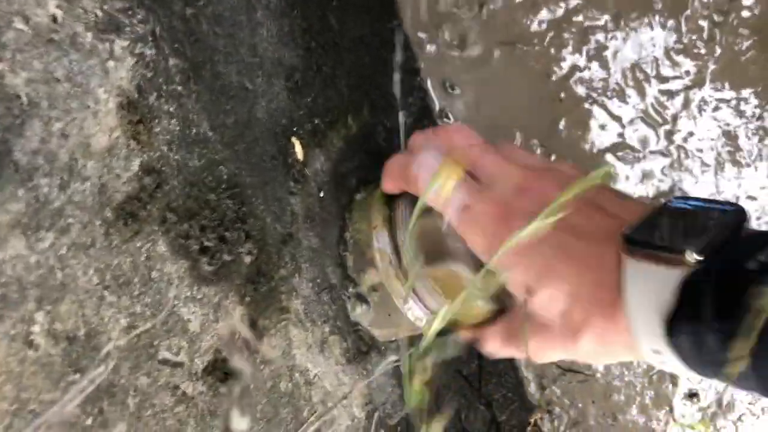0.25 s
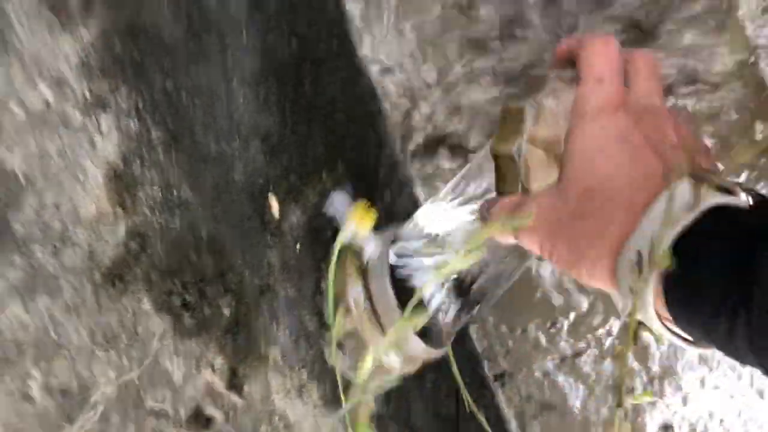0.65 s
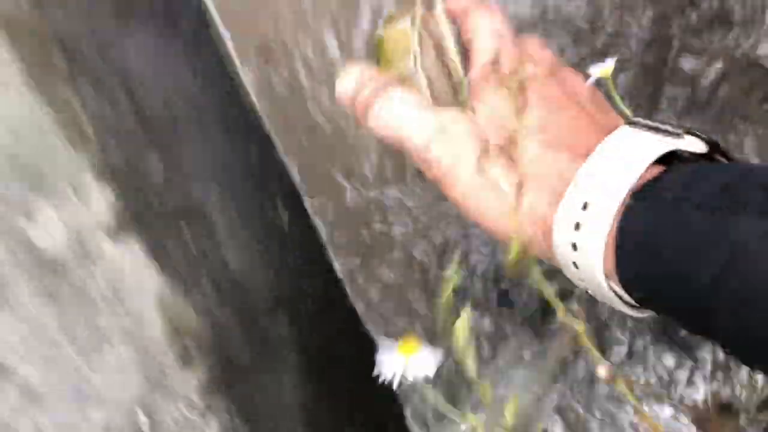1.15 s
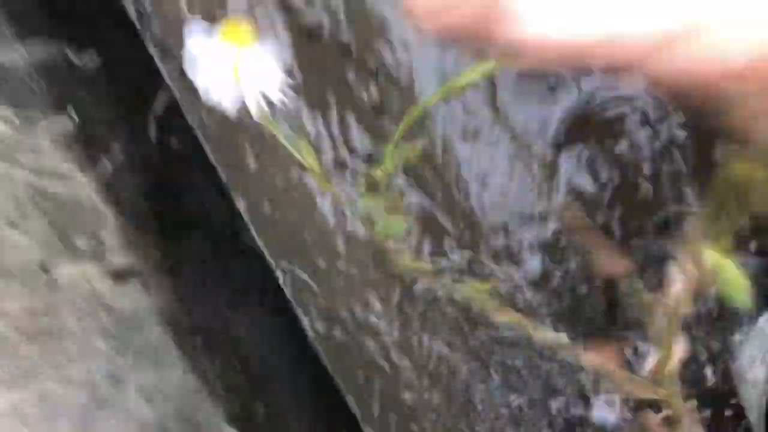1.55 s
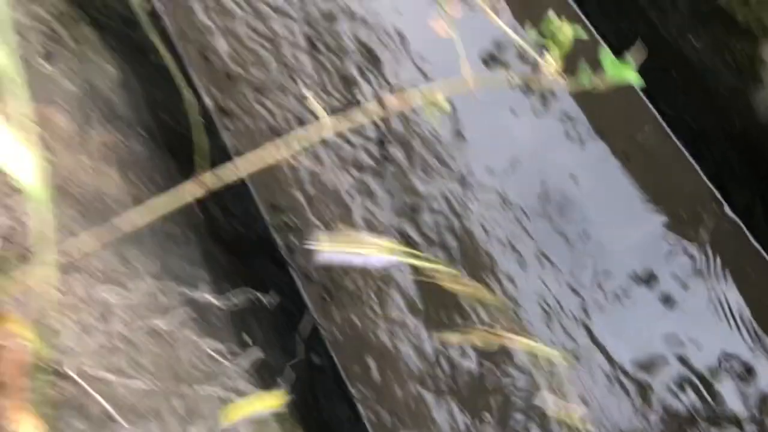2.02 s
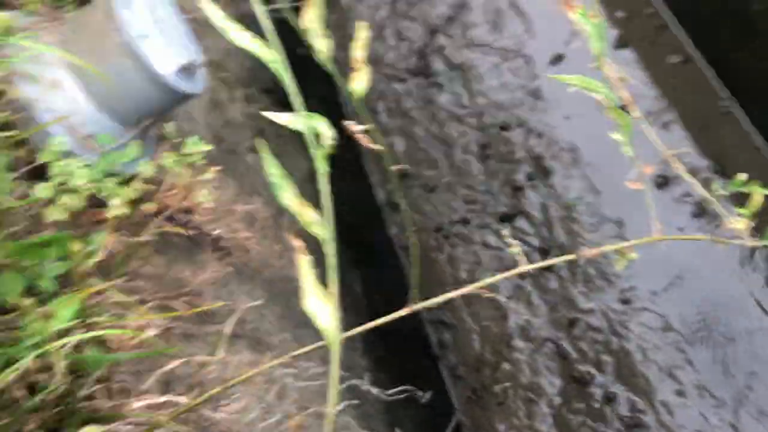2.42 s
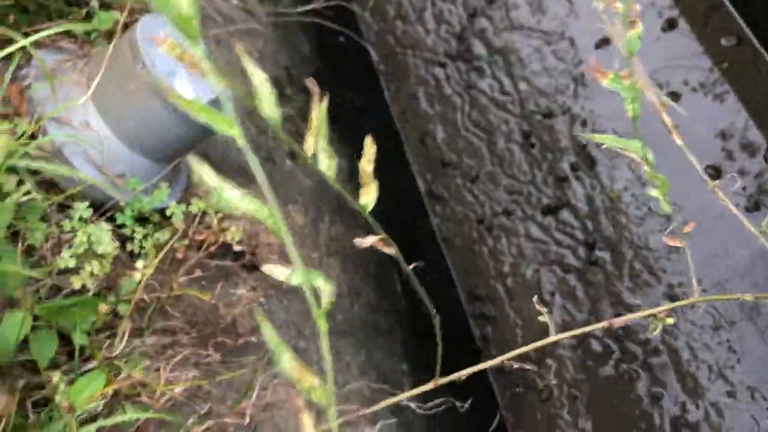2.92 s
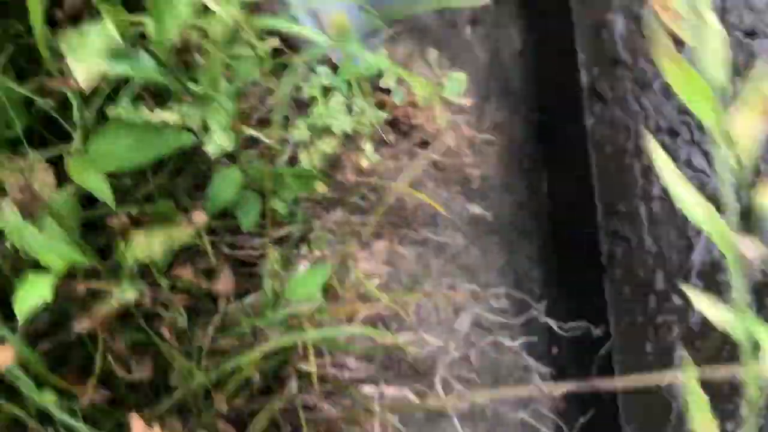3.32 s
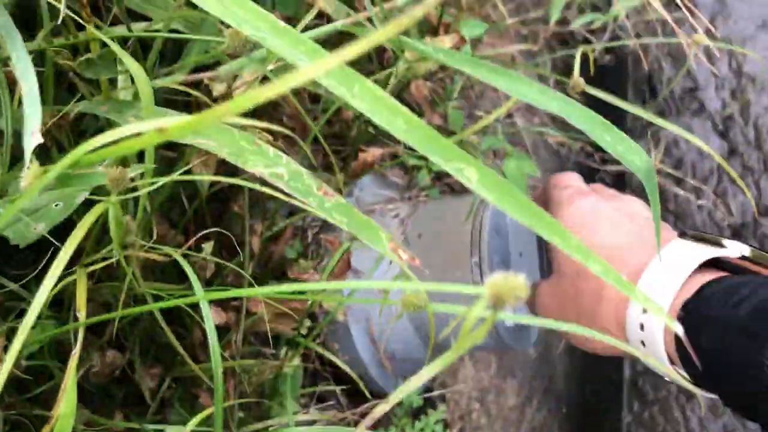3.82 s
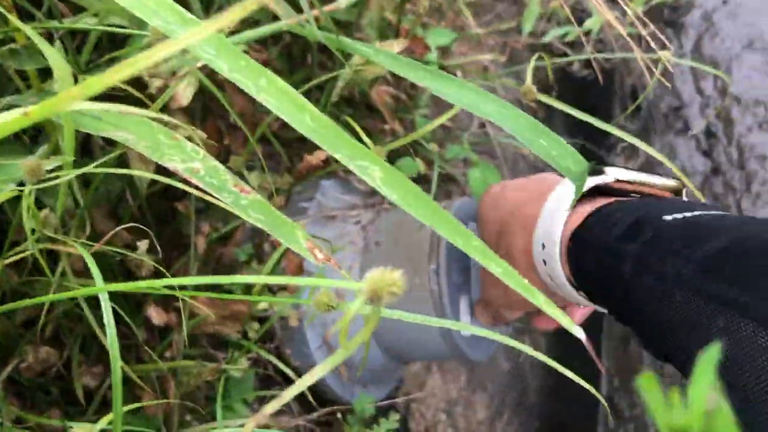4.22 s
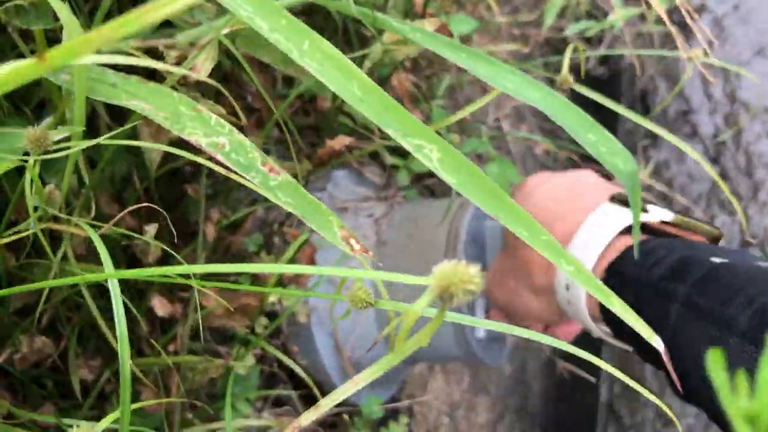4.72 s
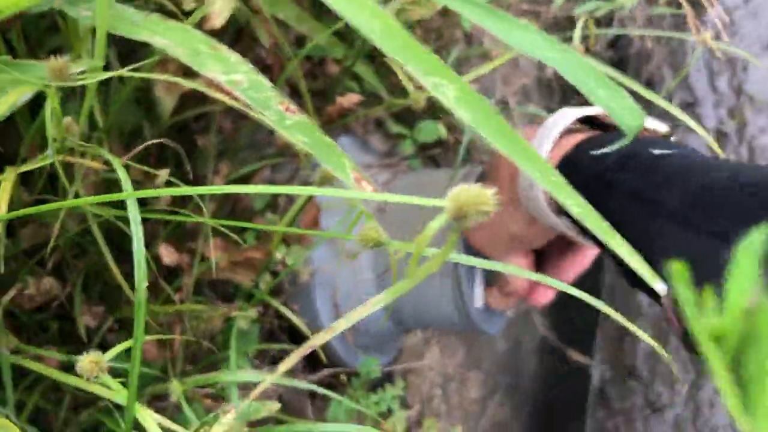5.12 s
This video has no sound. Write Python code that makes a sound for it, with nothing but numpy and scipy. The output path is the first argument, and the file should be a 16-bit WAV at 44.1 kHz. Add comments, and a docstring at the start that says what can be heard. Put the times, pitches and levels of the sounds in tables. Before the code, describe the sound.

Close to a muddy ditch, a cap is pulled off a drain pipe. A weak trickle and small spurts give way to a splashy, bubbling gush with surges, then one hollow knock of the cap. The water falls back to a trickle and thins to separate drips. Late, a sharp snap and faint rubs come from a hand in grass, over high hiss and low rumble. Handheld microphone, same in both ears.

```python
"""Water spurts, gushes in surges and settles to a bubbling trickle as a cap is pulled off a flooded field's
drain. The cap knocks once with a low thump, and a hand in the grass snaps, thuds and rubs, over wash, high
hiss, rumble and a faint engine hum. Water is swarms of ringing bubbles with puffs of splash noise; spray is
tiny noise bursts with ringing beads. The knock is gritty contact through resonances, thuds are sinking tones,
the hum is a wavering sine and the rest is shaped noise. Both ears hear the same."""
import sys
import numpy as np
from scipy import signal
from scipy.fft import rfft, irfft, next_fast_len
from scipy.io import wavfile
from scipy.ndimage import uniform_filter1d

SR = 44100
rng = np.random.default_rng(int(sys.argv[2]) if len(sys.argv) > 2 else 0)


def wrap_up_sound(samples):
    """Save the sound to the file named by the first command line argument, as 16-bit audio."""
    columns = np.atleast_2d(samples).T
    # keep every value between -1 and 1, then stretch to whole-number steps
    tamed = np.clip(columns, -1, 1)
    steps = np.round(tamed * 32767).astype(np.int16)
    wavfile.write(sys.argv[1], SR, steps)


N = 236139
TIME = np.arange(N) / SR


def amp(db):
    """Turns decibels into a linear gain."""
    return 10 ** (np.asarray(db) / 20)


def unit(x):
    """Scales to rms 1."""
    return x / np.sqrt(np.mean(x ** 2) + 1e-20)


def curve(rows, axis=1):
    """Draws one column of a breakpoint table as a line over the whole scene."""
    columns = np.transpose(rows)
    return np.interp(TIME, columns[0], columns[axis])


def add(mix, s, sound):
    """Lays a sound into the mix at time s."""
    part = mix[max(round(s * SR), 0):][:len(sound)]
    part += sound[:len(part)]


def colour(x, tone):
    """Filters x by the gains of a tone table, then scales it to rms 1."""
    hz, db = np.transpose(tone)
    size = next_fast_len(N, True)
    bins = np.fft.rfftfreq(size, 1 / SR)
    gain = amp(np.interp(np.log(bins + 1), np.log(hz), db))
    return unit(irfft(rfft(x, size) * gain, size)[:N])


def drift(hz):
    """Random wandering at rms 1, mostly slower than hz."""
    size = next_fast_len(N, True)
    bins = np.fft.rfftfreq(size, 1 / SR)
    smooth = rfft(rng.standard_normal(size)) / (1 + (bins / hz) ** 4)
    return unit(irfft(smooth, size)[:N])


def fade(t, t60):
    """Exponential decay by 60 dB in t60."""
    return np.exp(-np.log(1000) * t / t60)


def steadied(x, size):
    """Evens out the running power over size samples, leaving the single grains."""
    power = uniform_filter1d(uniform_filter1d(x ** 2, size), size)
    return x / np.sqrt(abs(power) + 0.19)


def resonate(x, hz, width):
    """A resonance of gain about 1 at its centre."""
    r = np.exp(-np.pi * width / SR)
    return 2 * signal.lfilter([1 - r], [1, -r * np.exp(2j * np.pi * hz / SR)], x).real


def bubble(hz, t60, rise):
    """A trapped air pocket swells in about one cycle and rings; its pitch climbs as it nears the surface."""
    t = np.arange(int(t60 * SR) + 2) / SR
    cycles = hz * (t + rise * t * t / (2 * t60))  # pitch climbs by the share rise within t60
    return (1 - np.exp(-t * hz)) * fade(t, t60) * np.sin(2 * np.pi * cycles)


def swarm(per_s, spread_db, cycles, mean_rise, low_hz, high_hz, cluster_s, count=120):
    """Bubbles of many sizes are born in clusters, one for each little spill; most are faint, a few stand out."""
    out = np.zeros(N)
    spills = np.cumsum(rng.gamma(2, 1, 240))
    spills *= TIME[-1] / spills[-1]
    birth_chance = per_s * TIME[-1] / count ** 2
    for hz in np.geomspace(low_hz, high_hz, count):
        length, lift, detune = rng.random(3)
        t60 = cycles * (.5 + length) / np.sqrt(hz * 1500)  # on average, cycles is the T60 in periods at 1500 Hz
        ring = bubble(hz * (1 + 0.043 * detune), t60, 2 * mean_rise * lift)
        ring *= np.sqrt(hz / np.sum(ring ** 2))  # energy in proportion to pitch
        draws = rng.random((count, 4))
        for _, spill, lag, size in draws[draws[:, 0] < birth_chance]:
            s = spills[int(spill * len(spills))] - cluster_s * np.log(lag)
            add(out, s, ring * amp(spread_db * min(-np.log(size), 3)))
    return out


def splat(bubbles, t60):
    """The drops that trap the bubbles burst with a short puff of noise at the same moments."""
    power = signal.oaconvolve(bubbles ** 2, fade(np.arange(2000) / SR, t60) ** 2)[:N]
    return unit(np.sqrt(abs(power)) * rng.standard_normal(N))


def pour(base_db, axis):
    """Strength of the gush: it opens, grows and runs out; each surge swells quickly and ebbs on top of it."""
    # spurts past the loosened cap, surges of the gush and late spills:
    # (time [s], bubbling level [dB], spray level [dB], length scale [s])
    surge_rows = [(-.02, -46, -43.5, 0.085), (0.064, -50, -46.5, 0.15), (.205, -56, -46, .07),
                  (0.41, -52, -42, 0.053), (0.446, -39.5, -34.5, 0.094), (0.606, -40, -33, 0.088),
                  (0.693, -35, -36, 0.059), (0.75, -38, -53, 0.06), (.905, -43, -37, 0.13),
                  (0.991, -39, -35.5, 0.069), (1.036, -33.5, -39, 0.13), (1.204, -44.5, -62, 0.076),
                  (1.684, -45.5, -54, 0.099)]
    surge_peak = 0.26  # share of its length scale after which a surge is strongest
    open_s, attack_s, spent_s, spent_t60 = .445, 0.021, 1.15, 0.29
    growth_db_per_s = 4  # the stream widens as the cap is drawn away
    age = np.clip(TIME, open_s, spent_s) - open_s
    steady = np.minimum(age / attack_s, 1) * amp(base_db + growth_db_per_s * age)
    power = (steady * fade(np.maximum(TIME - spent_s, 0), spent_t60)) ** 2
    for row in surge_rows:
        u = np.maximum(TIME - row[0], 0) / (surge_peak * row[-1])
        power += (amp(row[axis]) * u * np.exp(1 - u)) ** 2
    return np.sqrt(power)


def trickle_db(waver_db=.8, waver_hz=7):
    """The trickle that runs before and after the gush wavers unevenly about its slow course."""
    # strength of the trickle before the waver: (time [s], level [dB])
    trickle_rows = [(0, -55.5), (.3, -56.5), (1.2, -49), (1.55, -50.5), (1.85, -48), (2.1, -50), (2.4, -55),
                    (3.0, -56.5), (3.45, -60), (4.0, -56.5), (4.45, -64), (4.75, -59), (5.35, -62)]
    return curve(trickle_rows) + waver_db * drift(waver_hz)


def crouch(start_s=3.7, length_s=.55):
    """How far the listener has sunk behind the bank, 0-1; this dims trickle spray and makes the drips hollow."""
    return np.clip((TIME - start_s) / length_s, 0, 1)


def water(flow_db, hollow_low_hz=1150, hollow_high_hz=2500, hollow_db=4.5):
    """Crowded bubbles in the gush, separate ones in the trickle, sparse as it thins, all rough with splashing."""
    # filters for the bubbling of gush and trickle: (frequency [Hz], relative gain [dB])
    gush_tone = [(200, -37), (450, -5.5), (700, -15), (1200, 0), (1750, 0), (2500, 0), (4000, -4),
                 (5500, -11.5), (8000, -19)]
    trickle_tone = [(200, -22), (500, -10), (800, -3), (1300, -3.5), (1800, 1), (2150, -4.5), (2800, -1),
                    (3900, -1.5), (5000, -4.5), (7000, -24)]
    gush_db = -45  # bubbling as the pipe opens
    thin_from_db, thin_range_db, thin_share = -52, 5, 0.57  # a weak trickle breaks up into separate drips
    hollow_share = 0.41  # of the hollow band once fully crouched
    crowd = unit(swarm(per_s=1300, spread_db=4.0, cycles=32.0, mean_rise=0.37,
                       low_hz=469, high_hz=7030, cluster_s=.02))
    gush = steadied(colour(crowd + amp(-1) * splat(crowd, t60=0.033), gush_tone), size=1500)
    running = unit(swarm(per_s=620, spread_db=4.0, cycles=38, mean_rise=0.17,
                         low_hz=560.0, high_hz=5167, cluster_s=.011))
    sparse = unit(swarm(per_s=130, spread_db=3.5, cycles=42, mean_rise=0.12,
                        low_hz=598, high_hz=4800, cluster_s=.008))
    thin = thin_share * np.clip((thin_from_db - flow_db) / thin_range_db, 0, 1)
    drips = np.sqrt(1 - thin) * running + np.sqrt(thin) * sparse
    trickle = steadied(colour(drips + amp(-6.5) * splat(drips, t60=0.02), trickle_tone), size=3500)
    band = signal.butter(1, [hollow_low_hz, hollow_high_hz], "band", fs=SR, output="sos")
    hollow = amp(hollow_db) * signal.sosfiltfilt(band, trickle)
    trickle = trickle + hollow_share * crouch() * (hollow - trickle)
    return pour(gush_db, axis=1) * gush + amp(flow_db) * trickle


def spray(flow_db, per_s=1300, spread_db=5, t60=0.0066, beads_db=-5):
    """Landing drops are tiny bursts of fizz among ringing beads of air. More flow throws more spray."""
    # filter for the spray: (frequency [Hz], relative gain [dB])
    spray_tone = [(200, -42), (800, 0.5), (2500, 2), (4500, -1), (6500, 1), (8000, 1), (9500, -2),
                  (12000, 0.8), (15500, 3.5)]
    gush_spray_db = -42.5  # as the pipe opens
    trickle_spray_db, at_flow_db, slope = -52, -50, 1.1  # slope: dB of spray per dB of trickle
    crouch_db = -7  # the bank screens the trickle's spray
    drops = (rng.random(N) < per_s / SR) * amp(spread_db * np.minimum(rng.exponential(1, N), 4))
    power = signal.oaconvolve(drops ** 2, fade(np.arange(1000) / SR, t60) ** 2)[:N]
    fizz = steadied(unit(np.sqrt(abs(power)) * rng.standard_normal(N)), size=1500)
    beads = swarm(per_s=1000, spread_db=0.0, cycles=41, mean_rise=0.22,
                  low_hz=3460, high_hz=13800, cluster_s=.02)
    of_trickle = amp(trickle_spray_db + slope * (flow_db - at_flow_db) + crouch_db * crouch())
    strength = np.hypot(pour(gush_spray_db, axis=2), of_trickle)
    return strength * colour(fizz + amp(beads_db) * unit(beads), spray_tone)


def large_bubbles(count=3):
    """The loudest air bubbles ring singly, and each sheds smaller ones just after it."""
    # (time [s], starting pitch [Hz], level [dB], ring T60 [s])
    bubble_rows = [(0.0765, 2480, -30.5, 0.021), (.3809, 1850, -39, .035), (.457, 1000, -23, 0.044),
                   (0.47, 4080, -29.5, .035), (.4837, 1780, -26, .029), (.5084, 1200, -27.5, 0.028),
                   (.511, 1700, -25.5, 0.033), (0.58, 943, -28.5, 0.038), (0.6098, 994, -19.5, .026),
                   (.6456, 624, -19.5, 0.026), (0.7115, 3740, -18, 0.013), (.7248, 2060, -16.5, 0.0071),
                   (0.728, 2850, -23, 0.011), (.745, 1786, -22.5, 0.031), (0.77, 1706, -22.5, .04),
                   (.811, 4250, -24, 0.011), (0.818, 1790, -22.5, 0.025), (.8426, 1710, -21, .016),
                   (.861, 1600, -19.5, 0.015), (.9415, 1230, -21.5, 0.024), (0.951, 1670, -20.5, 0.02),
                   (0.9782, 1250, -19.5, 0.013), (1.0062, 1250, -22, 0.022), (1.0254, 4230, -22, 0.016),
                   (1.1578, 2650, -31, 0.016), (1.2103, 3600, -30, 0.016), (1.3031, 1320, -37.5, 0.055),
                   (1.3748, 1566, -27, 0.033), (1.375, 980, -26.5, 0.016), (1.4748, 1930, -36.5, .035),
                   (1.5564, 1760, -25.5, 0.023), (1.6513, 1870, -38, 0.047), (1.8098, 3720, -24.5, .009),
                   (1.8989, 3940, -27.5, .011), (1.962, 3716, -34.5, .018), (2.0746, 2240, -37, .018),
                   (2.277, 3970, -29, 0.022), (2.5008, 1754, -35.5, .018), (2.5887, 695, -39, 0.024),
                   (2.669, 4620, -35, .02), (2.82, 1772, -41.5, .035), (2.8517, 660, -35, .01),
                   (2.922, 2900, -32.5, .012), (3.009, 3310, -36, .015), (3.158, 3910, -34, 0.015),
                   (3.2955, 3500, -33, 0.014), (3.316, 1700, -37, .017), (3.4273, 3280, -39, .022),
                   (3.6226, 2530, -36, 0.03), (3.7799, 2657, -34, 0.017), (4.1113, 1690, -43, .025),
                   (4.2454, 1720, -42, .025), (4.5533, 1855, -29.5, 0.0065), (4.755, 2736, -33.5, 0.022),
                   (4.7742, 2710, -25, .013), (4.8202, 4720, -30.5, .012), (4.8918, 3280, -27, 0.0071),
                   (5.1625, 3470, -28, 0.0056), (5.32, 1450, -25, .006)]
    rise_per_s = 7.4  # share by which a large bubble's pitch climbs each second
    shed_db, shed_within_s = -12, .022  # against the parent
    shed_low, shed_high = .8, 1.624  # range of pitch ratio to the parent
    out = np.zeros(N)
    for s, hz, db, t60 in bubble_rows:
        rise = rise_per_s * t60
        add(out, s, amp(db) * bubble(hz, t60, rise))
        for lag, size in rng.random((count, 2)):
            ratio = shed_low * (shed_high / shed_low) ** size
            shed = bubble(hz * ratio, t60 / ratio, rise)
            add(out, s + lag * shed_within_s, amp(db + shed_db) * shed)
    return out


def glugs(rough_db=4.0, waver_share=0.046):
    """Air pockets squeezed smaller climb in pitch and tremble in the turbulent water."""
    # before the tremble: (time [s], length [s], start pitch [Hz], end pitch [Hz], level [dB])
    glug_rows = [(0.256, 0.0544, 489, 950, -50.5), (0.454, 0.022, 1104, 1810, -39),
                 (0.648, 0.043, 594, 983, -42.5), (0.67, 0.02, 1300, 1700, -39),
                 (0.68, 0.035, 918, 1040, -46)]
    out = np.zeros(N)
    tremble = amp(rough_db * drift(120))
    waver = 1 + waver_share * drift(150)
    for s, length, start_hz, end_hz, db in glug_rows:
        span = int(s * SR) + np.arange(int(length * SR))
        hz = np.linspace(start_hz, end_hz, len(span)) * waver[span]
        tone = np.sin(2 * np.pi * np.cumsum(hz) / SR)
        add(out, s, amp(db) * tremble[span] * signal.windows.tukey(len(hz), .5) * tone)
    return out


def ditch(x, t60=0.11, wet_db=-13):
    """Brief scatter between the concrete walls of the ditch."""
    t = np.arange(SR // 6) / SR
    sparse = (rng.random(len(t)) < .06) * (t > .002)
    taps = rng.standard_normal(len(t)) * sparse * fade(t, t60)
    return x + amp(wet_db) * signal.oaconvolve(x, taps / np.linalg.norm(taps))[:N]


def knock(contact=0.0029, lead=0.0024, lead_db=-15, release=0.0087, crack_db=-6):
    """The cap scrapes, then strikes: a few milliseconds of gritty contact ring its hollow body."""
    # hollow resonances of the cap: (frequency [Hz], width [Hz], relative level [dB])
    cap_modes = [(440, 200, -6.5), (1200, 180, 2.5), (1690, 290, 0), (2930, 300, -2), (4950, 230, 9.5),
                 (6070, 290, 7), (11200, 900, -9), (14200, 900, -12)]
    knock_s, knock_db = 1.1101, -10
    t = TIME - knock_s
    strike = (t > 0) * fade(np.maximum(t - contact, 0), release)
    scrape = amp(lead_db) * ((t > -lead) & (t <= 0))
    grit = (strike + scrape) * rng.choice([-1., 1.], N)
    body = sum(amp(db) * resonate(grit, hz, width) for hz, width, db in cap_modes)
    sound = body + amp(crack_db) * grit
    # the level holds for the whole energy packed into the contact time
    return amp(knock_db) * sound * np.sqrt(contact * SR / np.sum(sound ** 2))


def snaps(jitter_hz=550, thin_hz=3800, tail_db=-20, tail_t60=0.079):
    """Drops, fingers and stems snap: a thin crack with a short ring and a faint scatter after it."""
    # before the bass cut: (time [s], level [dB], ring pitch [Hz], T60 [s], crack noise gain [dB])
    snap_rows = [(.0683, -28, 14300, .01, -5), (.415, -36, 7440, 0.031, 7.5),
                 (0.517, -20, 14400, 0.0055, 4), (.6273, -25, 6730, .012, -2),
                 (0.6958, -23.5, 9100, 0.013, 11), (0.8608, -21.5, 12500, 0.0076, 12.5),
                 (0.9776, -23.5, 4100, 0.011, 5), (1.119, -23, 13400, .014, 6),
                 (1.3742, -32.5, 14700, .016, 5), (1.457, -35.5, 11700, .012, -9),
                 (1.743, -23, 5130, 0.024, 2), (1.998, -38, 5300, .014, 11), (2.954, -32, 5600, 0.0075, 8),
                 (4.3183, -35, 6000, 0.015, 4), (4.7856, -15.5, 9850, 0.0039, -11),
                 (4.785, -24.5, 5560, 0.022, -9)]
    out, t = np.zeros(N), np.arange(3000) / SR
    small = signal.butter(2, thin_hz, "high", fs=SR, output="sos")  # small things radiate little bass
    for s, db, hz, t60, crack_db in snap_rows:
        noise, grit = rng.standard_normal((2, len(t)))
        rough_hz = hz + jitter_hz * unit(uniform_filter1d(grit, size=12))
        ring = np.sin(2 * np.pi * np.cumsum(rough_hz) / SR)
        body = (ring + amp(crack_db) * 0.5 * noise) * fade(t, t60)
        scatter = amp(tail_db) * grit * fade(t, tail_t60)
        add(out, s, amp(db) * signal.sosfilt(small, body + scatter))
    return out


def thuds():
    """Dull thuds: decaying sines that sink in pitch. The one at 1.112 s is the low thump of the cap's knock;
    the others come from the hand in the grass."""
    # (time [s], level [dB], start pitch [Hz], end pitch [Hz], sinking time constant [s], T60 [s])
    thud_rows = [(.247, -34.5, 130, 80, .01, 0.15), (1.112, -24, 312, 40, 0.0072, 0.11),
                 (1.651, -36.5, 253.6, 55.6, 0.01, 0.29)]
    out, t = np.zeros(N), np.arange(SR // 5) / SR
    for s, db, start_hz, end_hz, sink, t60 in thud_rows:
        hz = end_hz + (start_hz - end_hz) * np.exp(-t / sink)
        add(out, s, amp(db) * fade(t, t60) * np.sin(2 * np.pi * np.cumsum(hz) / SR))
    return out


def rubs():
    """Soft rubs of hand and sleeve: short swells of noise with a fibrous flutter."""
    # (time [s], level [dB], length [s])
    rub_rows = [(0.202, -47.5, 0.079), (3.747, -51.5, .05), (4.854, -57, 0.035), (5.151, -51.5, 0.018),
                (5.303, -44.5, 0.041)]
    rub_tone = [(100, 4), (400, 2.0), (1600, 6.5), (4000, -2.5), (15000, -1.5)]  # (frequency [Hz], gain [dB])
    out = np.zeros(N)
    for s, db, length in rub_rows:
        fibres = colour(rng.standard_normal(N) * amp(4.2 * drift(230)), rub_tone)
        size = int(length * SR)
        add(out, s, amp(db) * unit(fibres[:size] * signal.windows.hann(size)))
    return out


def wash():
    """Bubbling of the ditch further along, blurred into a soft patter."""
    # fades as the listener crouches behind the bank, then comes back: (time [s], level [dB])
    wash_rows = [(0, -57.5), (1.6, -57), (2.8, -56), (3.8, -63), (4.7, -78), (5.35, -64.5)]
    # filter for the patter: (frequency [Hz], relative gain [dB])
    wash_tone = [(150, -13), (350, 3.5), (550, 0.5), (800, -5.5), (1300, -9), (1750, -7.5), (2200, -9.5),
                 (4000, -8.5), (7000, -27)]
    patter = swarm(per_s=1200, spread_db=5.5, cycles=23.6, mean_rise=0.2,
                   low_hz=296, high_hz=5060, cluster_s=0.033)
    return amp(curve(wash_rows)) * colour(unit(patter) + amp(-1.0) * rng.standard_normal(N), wash_tone)


def high_hiss():
    """Continuous high hiss: filtered noise whose level rises slowly and flutters slightly."""
    # level before the flutter: (time [s], level [dB])
    hiss_rows = [(0, -50), (2.5, -46), (5.35, -45)]
    # filter: (frequency [Hz], relative gain [dB])
    hiss_tone = [(1000, -28), (3300, -38), (4200, -12.5), (4800, -3), (5700, 2.5), (6300, 1), (7200, -5),
                 (8500, -3), (9200, -8.5), (9900, -19), (11000, -11), (13000, -9.5), (14500, -3.5),
                 (15700, -4)]
    return colour(rng.standard_normal(N), hiss_tone) * amp(curve(hiss_rows) + 0.81 * drift(36))


def low_rumble():
    """Lumpy outdoor rumble: mostly low noise of wandering level."""
    # level before the wander: (time [s], level [dB])
    rumble_rows = [(0, -49.5), (1.8, -51), (2.3, -52.5), (2.75, -52.5), (3.2, -54.5), (3.9, -50.5),
                   (4.6, -53), (5.35, -51.5)]
    # filter: (frequency [Hz], relative gain [dB])
    rumble_tone = [(15, -29), (35, -17), (62, 3.5), (90, 0), (130, -5.5), (250, -8), (400, -13.5),
                   (600, -21.5), (1100, -31.5), (1800, -26.5), (3000, -24.5), (6000, -26.5)]
    return colour(rng.standard_normal(N), rumble_tone) * amp(curve(rumble_rows) + 1.76 * drift(17))


def far_engine():
    """The faint hum of a far engine: one sine of wavering pitch and level."""
    # course before the waver: (time [s], pitch [Hz], level [dB])
    engine_rows = [(0, 227, -92), (1.35, 225, -69), (1.6, 228.5, -59.5), (2.45, 239, -60),
                   (2.7, 234, -55.5), (2.88, 225, -67), (3.15, 228.6, -59.5), (3.7, 246, -64),
                   (4.5, 251.1, -60.5), (5.35, 251, -63.5)]
    turns = np.cumsum(curve(engine_rows, axis=1) + 1.52 * drift(11.5)) / SR
    level_db = curve(engine_rows, axis=2) + 1.1 * drift(7.9)
    return unit(np.sin(2 * np.pi * turns)) * amp(level_db)


def scene():
    """All sources, the same in both ears; the near water scatters in the ditch."""
    flow_db = trickle_db()
    near_water = ditch(water(flow_db) + spray(flow_db) + large_bubbles() + glugs())
    handling = knock() + snaps() + thuds() + rubs()
    background = wash() + high_hiss() + low_rumble() + far_engine()
    mono = near_water + handling + background
    return np.array([mono, mono])


def record(dry, edge_hz=15850):
    """The band limit: a steep low-pass at edge_hz."""
    low_pass = signal.firwin(511, edge_hz, window=("kaiser", 9), fs=SR)
    return signal.oaconvolve(dry, low_pass[None], "same", axes=1)


dry = scene()
out = record(dry)
wrap_up_sound(out)
```